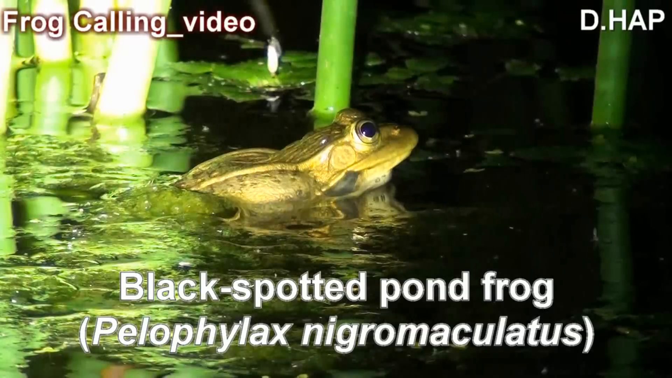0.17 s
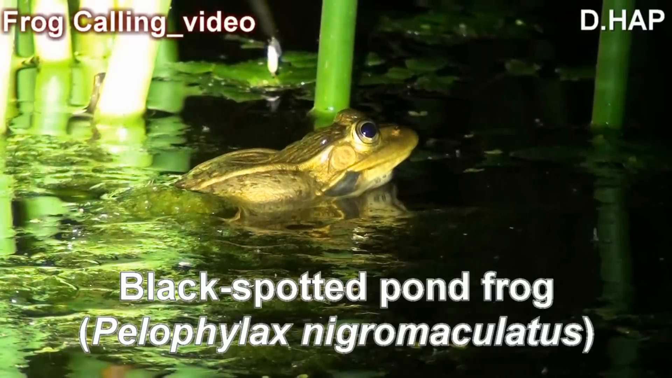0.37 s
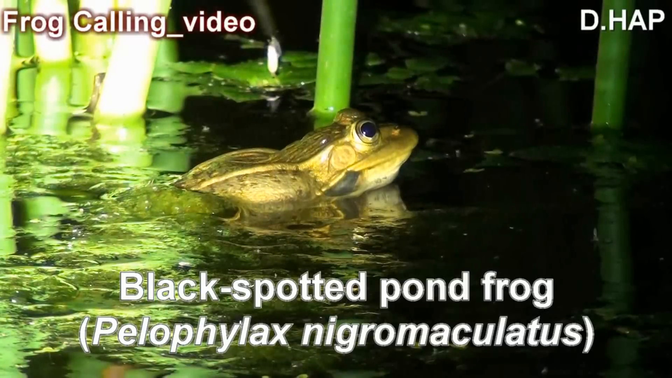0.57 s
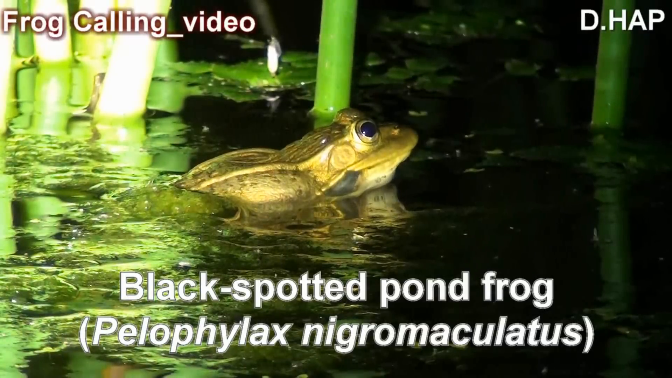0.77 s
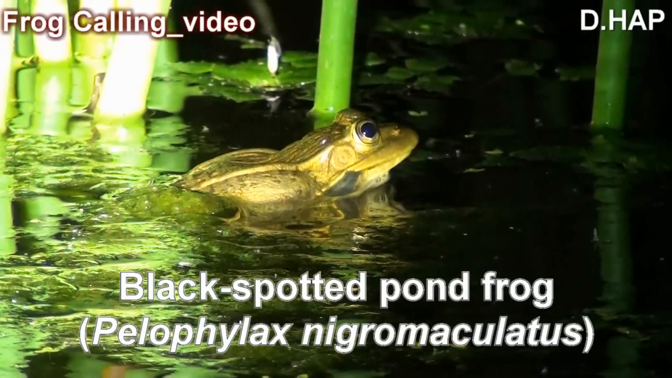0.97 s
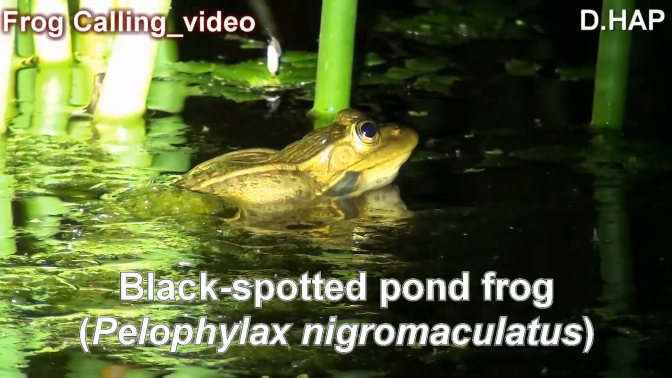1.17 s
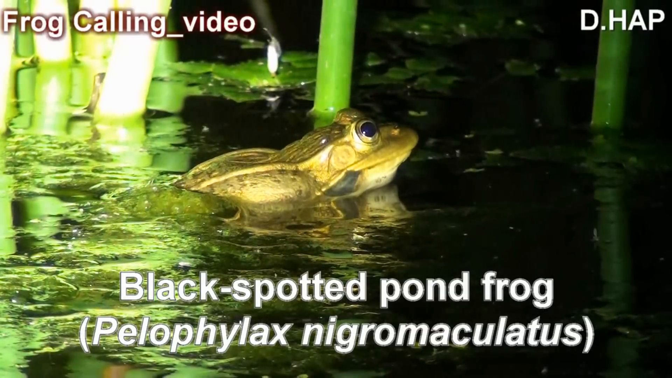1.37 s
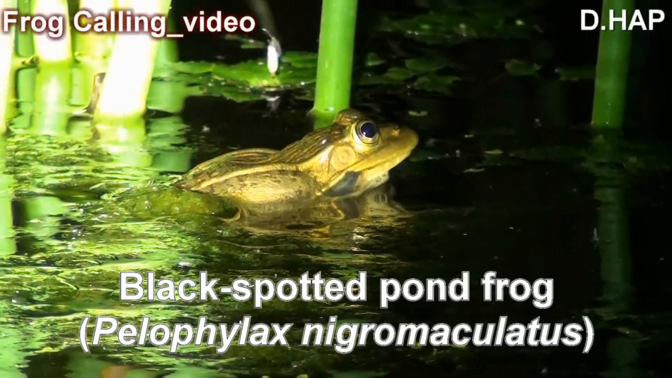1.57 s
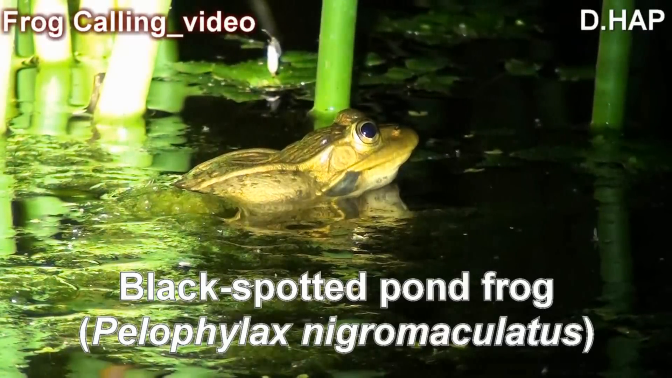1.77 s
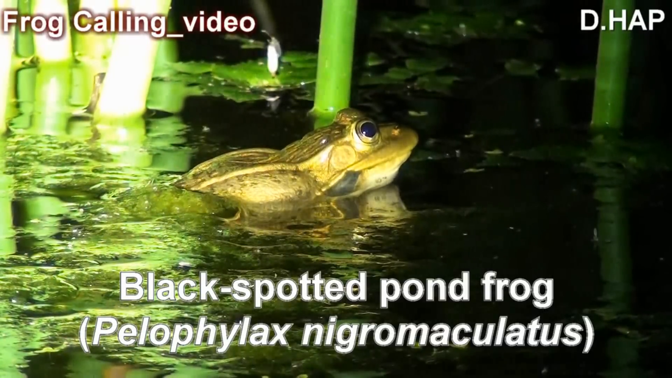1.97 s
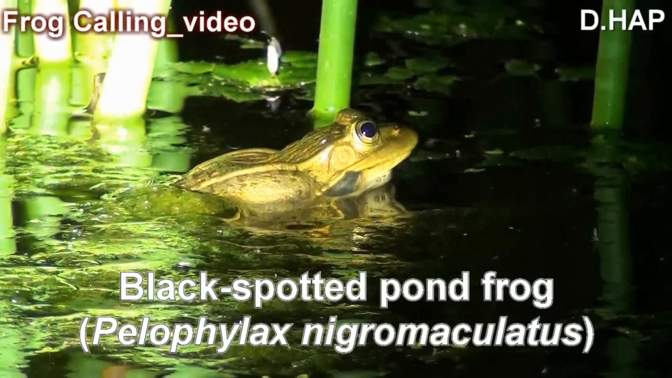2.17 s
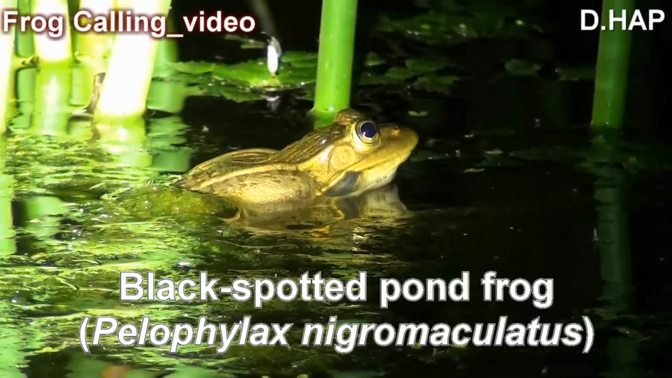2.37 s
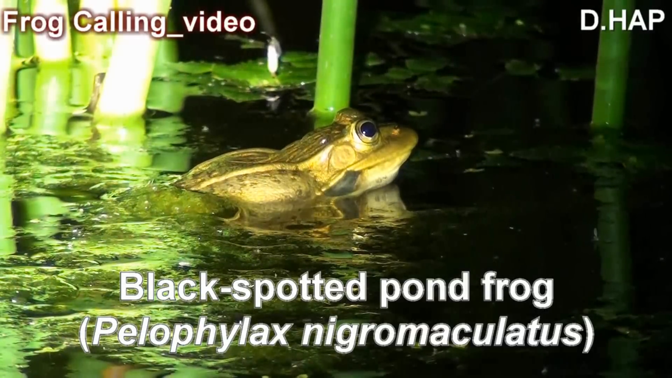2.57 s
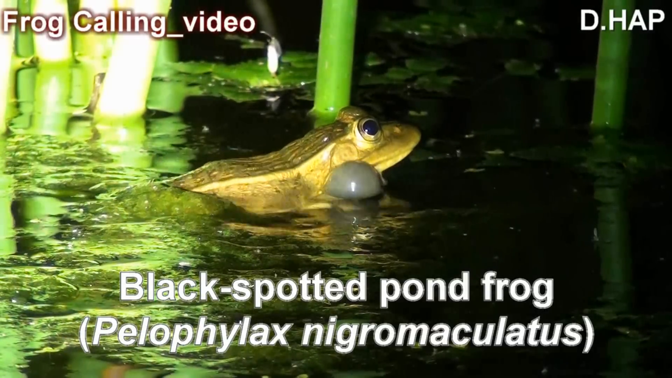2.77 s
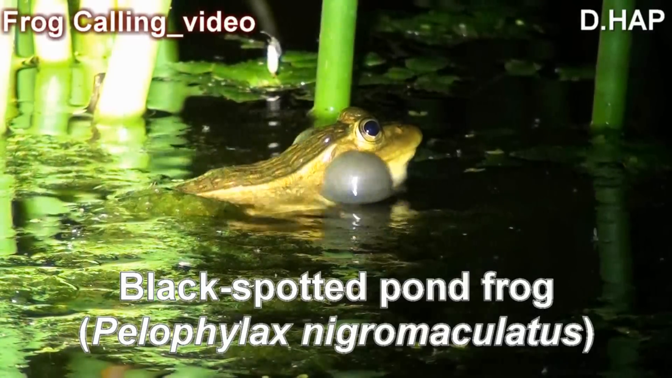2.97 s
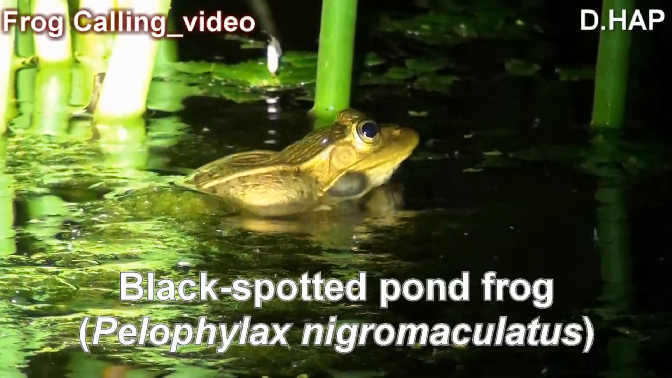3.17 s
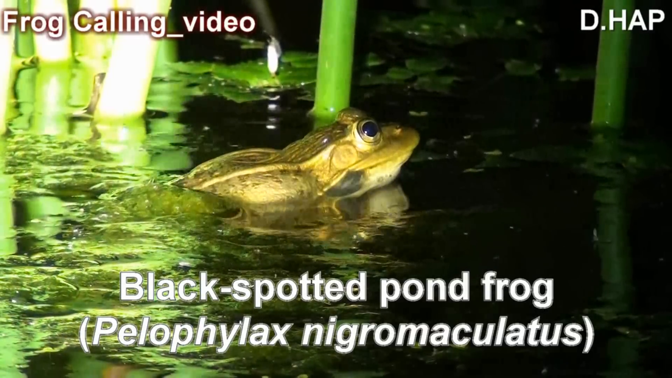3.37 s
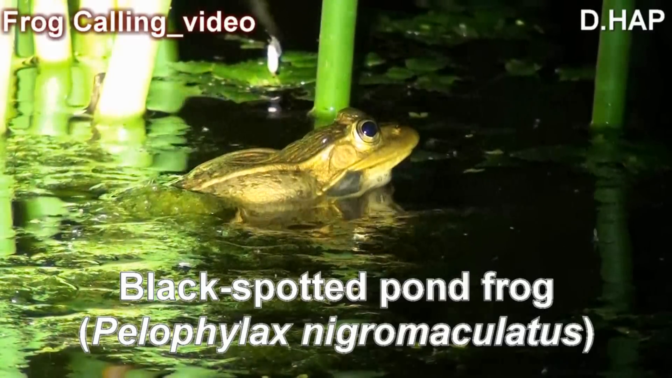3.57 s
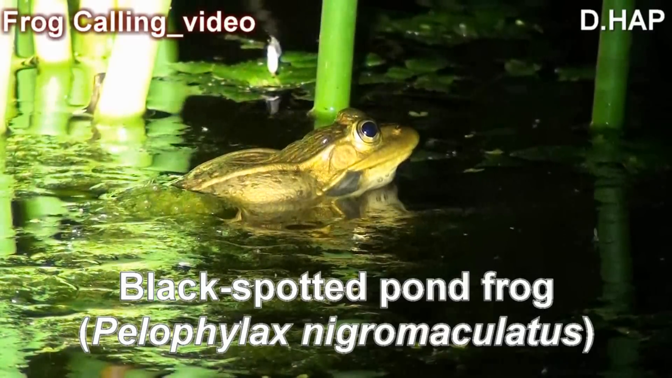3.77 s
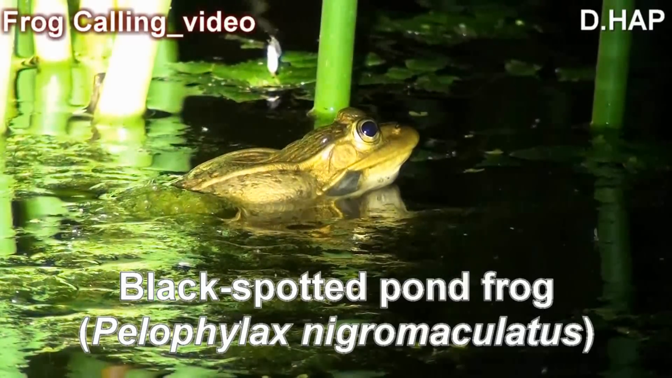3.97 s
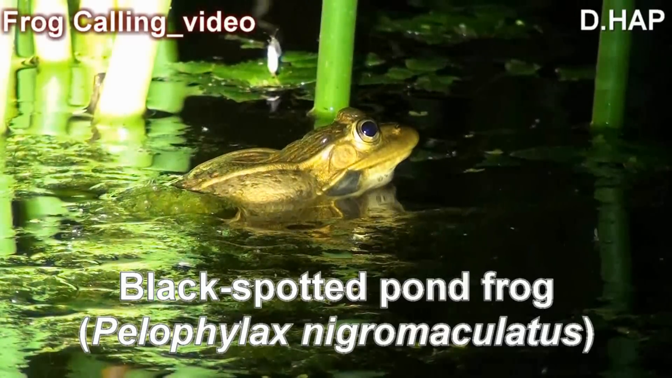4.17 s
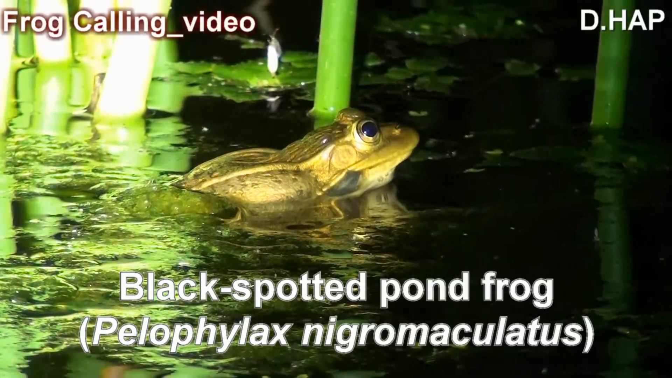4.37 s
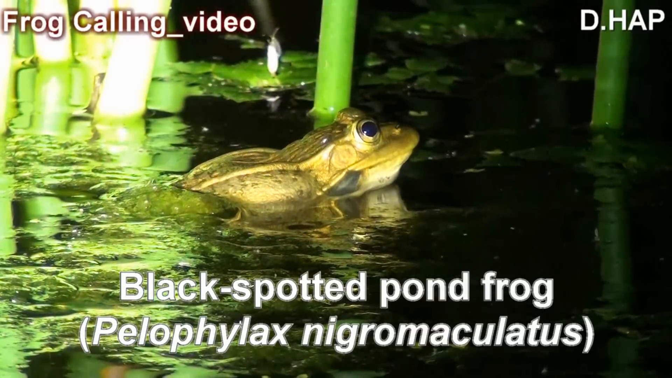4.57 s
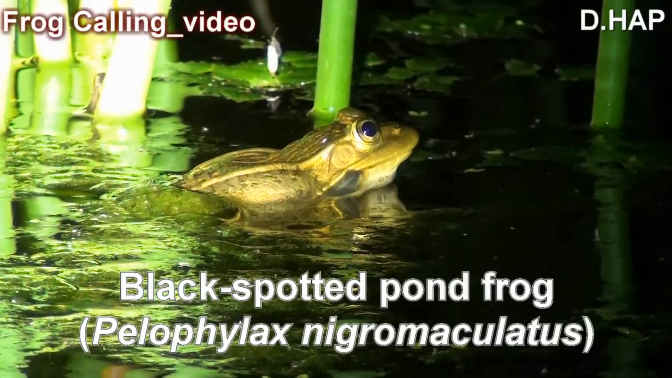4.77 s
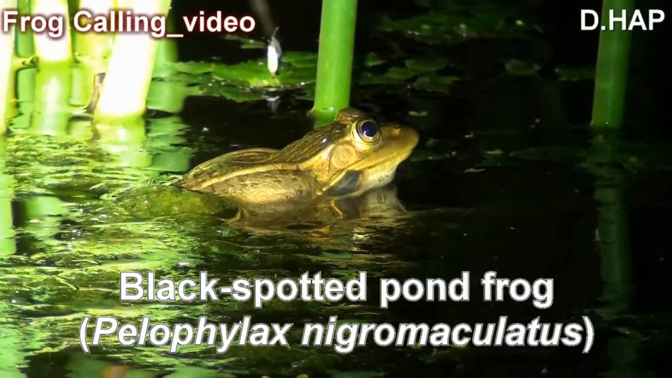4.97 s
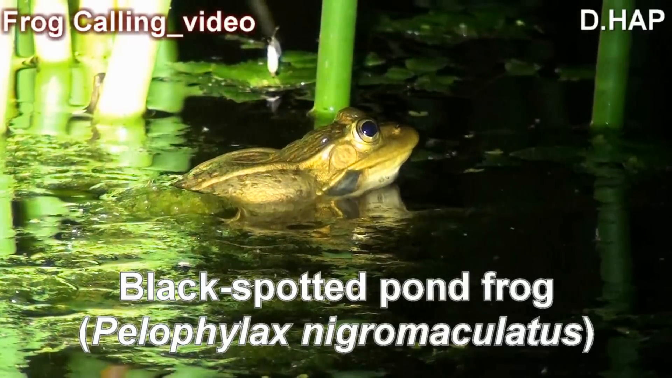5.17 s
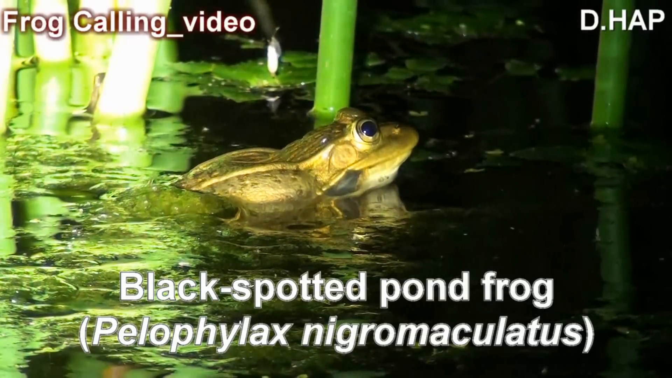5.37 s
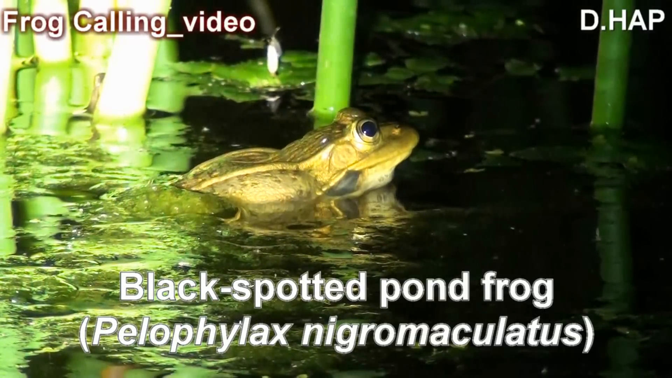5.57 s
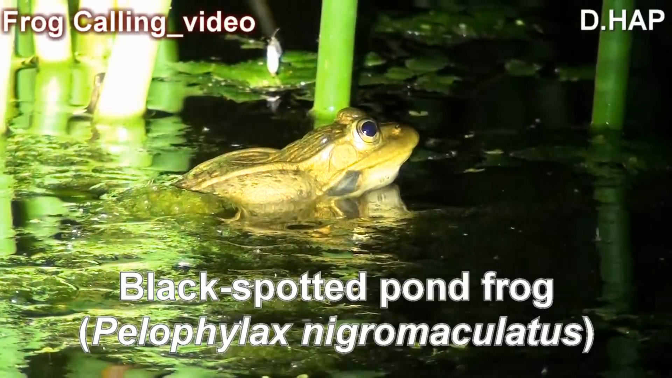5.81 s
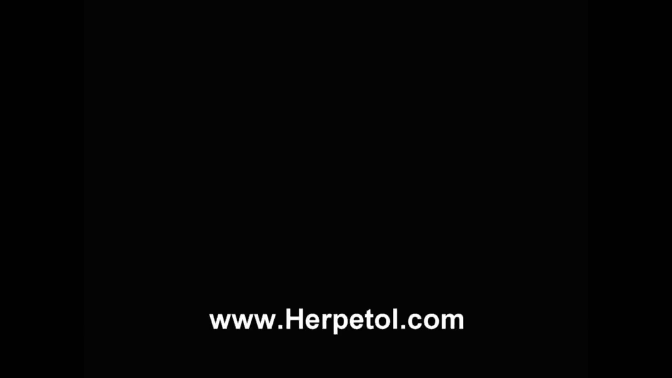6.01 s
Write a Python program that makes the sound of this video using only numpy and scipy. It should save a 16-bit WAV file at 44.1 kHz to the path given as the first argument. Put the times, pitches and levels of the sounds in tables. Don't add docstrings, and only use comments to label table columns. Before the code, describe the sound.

After a sliver of silence the insect bed snaps in: bright fast rasping, a high cricket buzz coming and going, a thin far cricket. A dry tree frog creak and a short mid-distance frog trill come first. Midway, one nearby frog rattles six growing notes, hollow and throaty, with slight echoes off water and reeds. Small water ticks follow; distant traffic murmurs low.

```python
import sys
import numpy as np
from scipy import signal
from scipy.fft import rfft, irfft
from scipy.io import wavfile
from scipy.ndimage import uniform_filter1d

SR = 44100
rng = np.random.default_rng(int(sys.argv[2]) if len(sys.argv) > 2 else 0)


def wrap_up_sound(samples):
    columns = np.atleast_2d(samples).T
    tamed = np.clip(columns, -1, 1)
    steps = np.round(tamed * 32767).astype(np.int16)
    wavfile.write(sys.argv[1], SR, steps)


def makeup_ratio(level_db):
    decades = np.asarray(level_db, float) / 20
    return 10 ** decades


N = 266452

# lag in seconds, level in dB.
ECHOES = [(.0045, -21), (.0085, -21), (.0145, -22), (.023, -25), (.036, -28), (.052, -31), (.08, -36)]
# frequency in Hz, left-right likeness from 0 to 1.
LIKENESS = [(110, .9997), (160, .997), (300, .994), (1000, .955), (2500, .86), (4500, .72), (7000, .87),
            (9500, .92), (12500, .99)]

# frequency in Hz, level in dB per Hz.
NIGHT_SPECTRUM = [(25, -20.5), (55, -6.5), (135, -0.5), (210, -4), (330, -11), (560, -14), (740, -7.5),
                  (1050, -4.5), (1700, -16.5), (2400, -22), (4200, -30), (4850, -25), (5600, -31),
                  (16000, -33)]
# centre in Hz, width in Hz, level in dB.
CHORUS_WINGS = [(6647, 780, -4), (8550, 910, -13.5), (9110, 1120, -3), (10180, 2300, -10)]
# time in seconds, level in dB.
FAR_CHORUS_SWELL = [
    (0, -3.5),
    (3.3, -4.5),
    (4.7, -2.5),
    (6.04, -2),
]
NIGHT_DB, CHORUS_DB = -43, -50.5

# time in seconds, lead over a steady stroke in cycles.
KATYDID_LEAD = [(0, -.12), (.9, 0.038), (1.5, .17), (1.8, 0.065), (2.1, 0.29), (2.4, 0.19), (2.7, 0.18),
                (3.6, .11), (3.9, 0.19), (4.3, 0.21), (5.1, 0.19), (5.4, .14), (6.04, 0.23)]
# time in seconds, level in dB.
KATYDID_LEVEL = [(0, -49), (1.5, -47.5), (2.7, -45.5), (3.3, -47), (4.2, -46), (6.04, -45)]
# centre in Hz, width in Hz, level in dB.
KATYDID_WING = [(8500, 510, -13), (9240, 280, -2.5), (9780, 820, -5), (10570, 630, -9), (12200, 690, -20),
                (13800, 1200, -24)]
KATYDID_STROKES_HZ = 28.75

# start in seconds, end in seconds, level in dB.
CRICKET_PHRASES = [
    (0.1, .655, -47.5),
    (2.01, 2.895, -48),
    (4.42, 5.28, -47.5),
]
# start in seconds, end in seconds, level in dB.
CRICKET_RESTS = [
    (.655, 1.45, -52.5),
    (2.895, 4, -57.5),
    (5.28, 6.1, -55.5),
]
# centre in Hz, width in Hz, level in dB.
CRICKET_COMB = [(7530, 150, 0), (7000, 450, -9), (7670, 100, -5), (7920, 200, -14)]
# centre in Hz, width in Hz, level in dB.
CRICKET_RASP = [(6460, 380, -12.5), (6670, 400, -10), (7250, 820, 6), (7420, 690, -3)]
CRICKET_HZ, CRICKET_WANDER_HZ, CRICKET_STROKES_HZ = 7530, 20, 128.2
WARMUP_DB_PER_S, RASP_WARMUP_DB_PER_S, STOP_DB_PER_S = 130, 18, 1200

# start in seconds, end in seconds, level in dB.
FAR_CRICKET_PHRASES = [
    (0.1, 1.1, -56),
    (2.3, 1.6, -46),
    (4.5, 6.1, -52.5),
]
FAR_CRICKET_HZ, FAR_WARMUP_DB_PER_S = 7150, 28

FRAME_RATE_HZ, WHINE_HZ, WHINE_DB, WHINE_LAG_CYCLES = 29.97, 3585, -69, 0.76

# frequency in Hz, level in dB, 60 dB decay in seconds.
TREE_MODES = [(1560, 5.5, 0.014), (1950, 6.5, 0.0029), (3180, -3, 0.012), (3260, -4, 0.01),
              (3960, -6, 0.012)]
TREE_FROM_S, TREE_TO_S, TREE_GAP_S = .124, .245, .0062
TREE_PEAK_S, TREE_PEAK_DB, TREE_FALL_DB_PER_S, TREE_HUM_DB = .1275, -26, 800, -43

# frequency in Hz, level in dB, 60 dB decay in seconds.
FAR_MODES = [(507, 3.5, 0.035), (780, -8.5, 0.012), (947, -7, 0.018), (1440, -8, 0.033), (1790, 2.5, 0.016),
             (1700, -26, .012), (1910, -13, 0.011), (2090, -10, 0.0075), (2650, -14, 0.007),
             (4730, -29, 0.014)]
# start in seconds, length in seconds, clicks, growth of each gap's delay.
FAR_NOTES = [
    (.1815, .0182, 5, 1.2),
    (.2385, .0217, 8, 2.4),
    (.2965, .0257, 9, 2.8),
    (.3545, .029, 11, 2.1),
]
# peak level in dB, low sac mode re peak in dB.
FAR_EFFORT = [
    (-31.5, 2),
    (-21, -6),
    (-19, -7),
    (-21.5, -4.5),
]

# frequency in Hz, level in dB, 60 dB decay in seconds.
NEAR_MODES = [(428, -4.5, 0.033), (850, -16, 0.0086), (1025, -0.5, 0.011), (1456, -5, 0.016),
              (1652, 0.5, 0.012), (1584, -12.5, 0.038), (1837, -9, 0.024), (2100, -8, 0.0099),
              (2410, -19, 0.023), (2700, -21, 0.018), (3000, -21, 0.0062), (3700, -41, 0.022)]
# start in seconds, length in seconds, clicks, growth of each gap's delay.
NEAR_NOTES = [
    (2.789, .0243, 5, 2.1),
    (2.8396, .0289, 7, 2.1),
    (2.8978, .0354, 7, 2.2),
    (2.9546, .0257, 6, 2.2),
    (3.0109, .0358, 7, 2.4),
    (3.0686, .0369, 8, 1.8),
]
# peak level in dB, low sac mode re peak in dB.
NEAR_EFFORT = [
    (-25.5, 9),
    (-17, 4),
    (-12.5, 1.5),
    (-10, -2),
    (-8, 0),
    (-7.5, -1),
]

NEAR_GAP_S, FAR_GAP_S = .0031, .0023
FIRST_DB, SECOND_DB = -22, -1
NEAR_SAG_DB_PER_S, FAR_SAG_DB_PER_S = 182, 340
LOW_PEAK_S, LOW_RISE_DB_PER_S, LOW_FALL_DB_PER_S = .012, 2200, 546
LOW_DROOP, LOW_DROOP_S = 0.14, 0.0057
SWELL_FROM_S, SWELL_S = 2.86, 0.046
SLACK_PITCH, FULL_PITCH = 0.89, 1.01
WHISTLE_HZ, WHISTLE_DB, WHISTLE_SAG_HZ_PER_S = 4360, -37.5, 2300

# time in seconds, peak level in dB, frequency in Hz.
DRIPS = [
    (4.0265, -38, 7000),
    (4.0270, -35, 9300),
    (4.0267, -41, 5900),
    (4.0268, -39, 8100),
    (4.0271, -40, 10400),
    (5.344, -42, 4450),
    (5.323, -50, 4800),
]
START_S, FADE_S, CUTOFF_HZ = 0.1221, 0.0034, 15780


def rms_one(x):
    return x / np.sqrt(np.mean(x ** 2) + 1e-20)


def in_time(rows):
    s, *columns = np.transpose(rows)
    return [np.interp(np.arange(N) / SR, s, c) for c in columns]


def at_hz(points, hz):
    points = np.array(points)
    return np.interp(np.log(hz), np.log(points[:, 0]), points[:, 1])


def drift(rate):
    r = np.exp(-80 * np.pi * rate / SR)
    slow = signal.lfilter([1], [1, -2 * r, r * r], rng.standard_normal(N // 40 + 2002))[2000:]
    return np.interp(np.arange(N) / 40, np.arange(len(slow)), rms_one(slow))


def wavering_tone(hz, wander_hz, rate):
    return np.sqrt(2) * np.sin(2 * np.pi * np.cumsum(hz + wander_hz * drift(rate)) / SR)


def ring(clicks, hz, t60):
    r, w = makeup_ratio(-60 / (t60 * SR)), 2 * np.pi * hz / SR
    return signal.lfilter([0, np.sin(w)], [1, -2 * r * np.cos(w), r * r], clicks + 1e-18)


def train(times, heights):
    out = np.zeros(N)
    np.add.at(out, np.round(np.asarray(times) * SR).astype(int), heights)
    return out


def stereo_noise(spectrum_gain):
    hz = np.maximum(np.fft.rfftfreq(N, 1 / SR), 1)
    alike = np.clip(at_hz(LIKENESS, hz), 0, 1)
    mid, side = rfft(rng.standard_normal((2, N))) * spectrum_gain(hz)
    mid, side = np.sqrt(1 + alike) * mid, np.sqrt(1 - alike) * side
    return rms_one(irfft([mid + side, mid - side], N))


def wings(modes, order=2):
    def gain(hz):
        return np.sqrt(sum(makeup_ratio(db) ** 2 / (1 + (2 * (hz - centre) / width) ** 2) ** order
                           for centre, width, db in modes))
    return gain


def phrases(rows, rise_db_per_s, fall_db_per_s):
    t = np.arange(N) / SR
    return np.max([db - rise_db_per_s * np.maximum(start - t, 0) - fall_db_per_s * np.maximum(t - end, 0)
                   for start, end, db in rows], axis=0)


def outdoors(dry, wet_db, pan_db):
    dull = signal.lfilter([.5], [1, -.5], dry)
    out = np.outer(makeup_ratio([pan_db / 2, -pan_db / 2]), dry)
    for lag_s, db in ECHOES:
        length = int(lag_s * SR * .6)
        smear = rng.standard_normal(length) + 1.1 * rng.standard_normal((2, length))
        for side in range(2):
            tail = np.r_[np.zeros(int(lag_s * SR * .7)), smear[side] / np.sqrt(length)]
            out[side] += makeup_ratio(db + wet_db) * signal.oaconvolve(dull, tail)[:N]
    return out


def night():
    (swell_db,) = in_time(FAR_CHORUS_SWELL)
    rumble = stereo_noise(lambda hz: makeup_ratio(at_hz(NIGHT_SPECTRUM, hz)))
    croaks = signal.sosfilt(signal.butter(2, [600, 1600], "band", fs=SR, output="sos"), rumble)
    rumble = rumble + (makeup_ratio(swell_db + 0.41 * drift(5.3)) - 1) * croaks
    insects = makeup_ratio(CHORUS_DB + .5 * drift(12)) * stereo_noise(wings(CHORUS_WINGS))
    return makeup_ratio(NIGHT_DB) * rumble + insects


def katydid():
    (lead,), (level_db,) = in_time(KATYDID_LEAD), in_time(KATYDID_LEVEL)
    cycle = 2 * np.pi * (KATYDID_STROKES_HZ * np.arange(N) / SR + lead + 0.014 * drift(7.4))
    stroke = 1 / (1 + np.exp(-4.0 * (np.cos(cycle) - .45)))
    teeth = makeup_ratio(drift(10) + drift(200))
    return makeup_ratio(level_db - 4.5) * rms_one(stroke * teeth) * stereo_noise(wings(KATYDID_WING))


def cricket():
    tone_db = phrases(CRICKET_PHRASES, WARMUP_DB_PER_S, STOP_DB_PER_S)
    rasp_db = phrases([*CRICKET_PHRASES, *CRICKET_RESTS], RASP_WARMUP_DB_PER_S, STOP_DB_PER_S)
    cycle = 2 * np.pi * np.cumsum(CRICKET_STROKES_HZ + drift(2.93)) / SR
    wing = 2 * np.pi * np.cumsum(CRICKET_HZ + CRICKET_WANDER_HZ * drift(27)) / SR
    comb_gain = wings(CRICKET_COMB)
    tone = np.zeros(N)
    for k in range(-6, 4):
        height = comb_gain(CRICKET_HZ + k * CRICKET_STROKES_HZ) * makeup_ratio(2.3 * drift(25))
        tone += height * np.cos(wing + k * cycle + 0.515 * k * k)
    rasp = (1 + 0.073 * np.cos(cycle)) * stereo_noise(wings(CRICKET_RASP))
    panned_tone = makeup_ratio(tone_db - 3.0) * rms_one(tone) * makeup_ratio([[.4], [-.4]])
    return panned_tone + makeup_ratio(rasp_db - 2.0) * rms_one(rasp)


def far_cricket():
    level_db = phrases(FAR_CRICKET_PHRASES, FAR_WARMUP_DB_PER_S, STOP_DB_PER_S)
    tone = wavering_tone(FAR_CRICKET_HZ, 55.1, 60)
    return makeup_ratio(level_db - 7.5 + 2.7 * drift(35)) * tone * makeup_ratio([[-1.5], [1.5]])


def camera_whine():
    cycle = 2 * np.pi * (FRAME_RATE_HZ * np.arange(N) / SR - WHINE_LAG_CYCLES)
    swell = rms_one(np.exp(np.cos(cycle)))
    return makeup_ratio(WHINE_DB + 1.2 * drift(12)) * swell * wavering_tone(WHINE_HZ, 16.0, 40)


def tree_frog():
    s = np.arange(TREE_FROM_S, TREE_TO_S, TREE_GAP_S)[:21]
    s[1:7] = TREE_PEAK_S + 0.8 * TREE_GAP_S * np.arange(6)
    chance = rng.standard_normal((21, len(TREE_MODES) + 2))[:len(s)]
    s[2:] += 0.00097 * np.clip(chance[2:, -1], -2, 2)
    hum_db = TREE_HUM_DB + 1.5 * np.tanh(chance[:, -2])
    peak_db = np.maximum(TREE_PEAK_DB - TREE_FALL_DB_PER_S * abs(s - TREE_PEAK_S), hum_db)
    rings = np.zeros(N)
    for k, (hz, db, t60) in enumerate(TREE_MODES):
        rings += ring(train(s - .0012, makeup_ratio(peak_db + db + 1.9 * chance[:, k])), hz, t60)
    throat = ring(rings, 3210, 0.0045) * 0.11
    return outdoors(throat, wet_db=8.5, pan_db=0.0)


def rattle(notes, efforts, gap_s, sag_db_per_s, uneven_db):
    rows = []
    for (start, length, count, growth), (peak_db, low_db) in zip(notes, efforts):
        k = np.arange(count)
        delay = (growth ** k - 1) / (growth ** k[-1] - 1)
        t = gap_s * k + (length - gap_s * k[-1]) * delay
        level = peak_db + FIRST_DB * (k == 0) + SECOND_DB * (k == 1) - sag_db_per_s * t
        low = low_db - LOW_RISE_DB_PER_S * np.maximum(LOW_PEAK_S - t, 0)
        low = low - LOW_FALL_DB_PER_S * np.maximum(t - LOW_PEAK_S, 0)
        chance = np.clip(rng.standard_normal((count, 2)), -1.5, 1.5)
        rows += zip(start + t + 0.00013 * chance[:, 0], level + uneven_db * chance[:, 1], low)
    return rows


def frog(clicks, modes, rise_s, spread_db, swell=None):
    hz, db, t60 = np.transpose(modes)[:, :, None]
    t = np.arange(int(.08 * SR)) / SR
    shape = (1 - np.exp(-t / rise_s)) ** 2 * makeup_ratio(-60 * t / t60)
    chance = rng.standard_normal((len(clicks), 2, len(modes), 1))
    whistle_hz, whistle_db, factor = swell if swell else (0, -200, np.ones(N))
    out = np.zeros(N)
    for (s, peak_db, low_db), (louder, higher) in zip(clicks, chance):
        at = round(s * SR)
        strength = makeup_ratio(peak_db + db + spread_db * np.clip(louder, -1, 1))
        strength[0] *= -makeup_ratio(low_db)
        pitch = hz * (1 + .01 * higher) * factor[at]
        pitch[0] /= factor[at] ** 1.64
        cycles = pitch * t
        cycles[0] += pitch[0] * LOW_DROOP * LOW_DROOP_S * (1 - np.exp(-t / LOW_DROOP_S))
        out[at:at + len(t)] += np.sum(strength * shape * np.sin(2 * np.pi * cycles), axis=0)
    s, peak_db, _ = np.transpose(clicks)
    puffs = signal.lfilter([1], [1, -makeup_ratio(-60 / (0.041 * SR))], train(s, makeup_ratio(peak_db)))
    puffs = uniform_filter1d(puffs, size=40, origin=19)
    out += makeup_ratio(whistle_db + 2.3 * drift(160)) * puffs * wavering_tone(whistle_hz, 120.0, 350)
    return signal.sosfilt(signal.cheby1(4, .5, [370, 4900], "band", fs=SR, output="sos"), out)


def far_frog():
    clicks = rattle(FAR_NOTES, FAR_EFFORT, FAR_GAP_S, FAR_SAG_DB_PER_S, uneven_db=1.7)
    return outdoors(frog(clicks, FAR_MODES, rise_s=0.00034, spread_db=3.5), wet_db=-3.0, pan_db=1.1)


def sac_swell():
    since = np.clip(np.arange(N) / SR - SWELL_FROM_S, 0, .5)
    factor = FULL_PITCH + (SLACK_PITCH - FULL_PITCH) * np.exp(-since / SWELL_S)
    return WHISTLE_HZ - WHISTLE_SAG_HZ_PER_S * since, WHISTLE_DB, factor


def near_frog():
    clicks = rattle(NEAR_NOTES, NEAR_EFFORT, NEAR_GAP_S, NEAR_SAG_DB_PER_S, uneven_db=1.7)
    voice = frog(clicks, NEAR_MODES, rise_s=0.00029, spread_db=4.0, swell=sac_swell())
    return outdoors(voice, wet_db=-4.0, pan_db=0.7)


def drips():
    return sum(ring(train([s], makeup_ratio(db)), hz, 67.0 / hz) for s, db, hz in DRIPS)


def scene():
    insects = katydid() * makeup_ratio([[-.3], [.3]]) + cricket() + far_cricket()
    frogs = tree_frog() + far_frog() + near_frog()
    return night() + insects + camera_whine() + frogs + drips()


def top_cut(x):
    return signal.sosfilt(signal.butter(12, 16830, fs=SR, output="sos"), x)


def record(dry):
    fade = np.clip((np.arange(N) / SR - START_S) / FADE_S, 0, 1)
    low_pass = signal.ellip(12, .5, 70, CUTOFF_HZ, fs=SR, output="sos")
    mix = signal.sosfilt(low_pass, dry * fade)
    return top_cut(mix)


dry = scene()
out = record(dry)
wrap_up_sound(out)
```